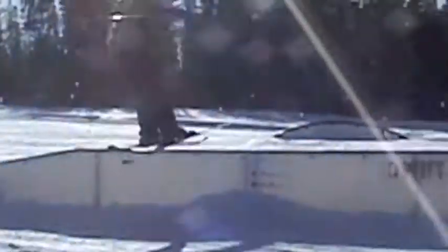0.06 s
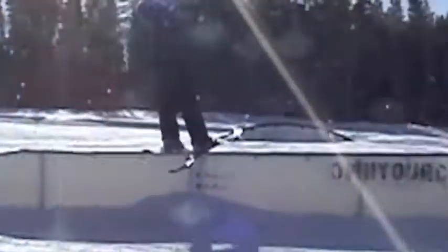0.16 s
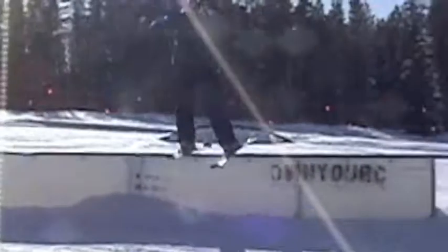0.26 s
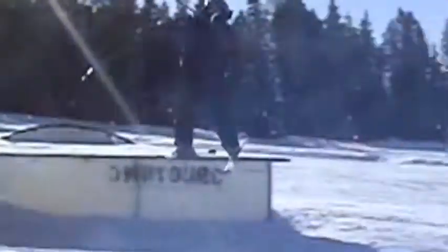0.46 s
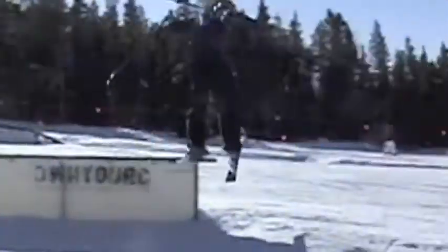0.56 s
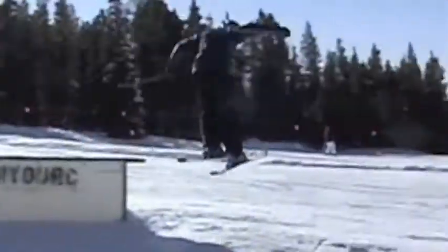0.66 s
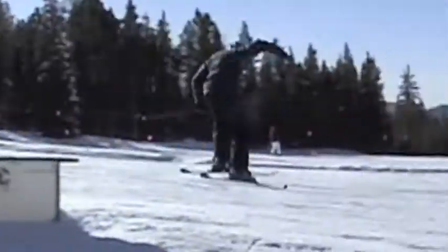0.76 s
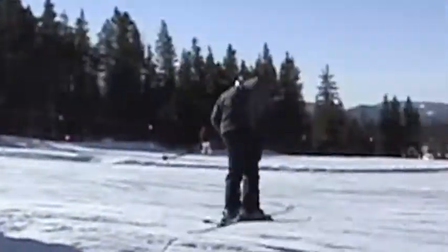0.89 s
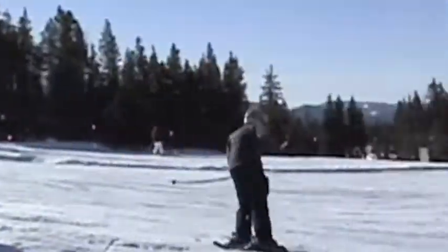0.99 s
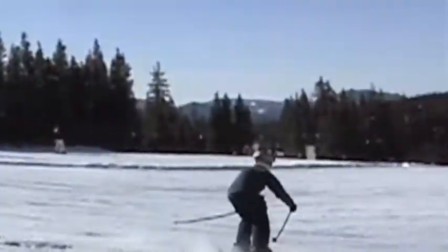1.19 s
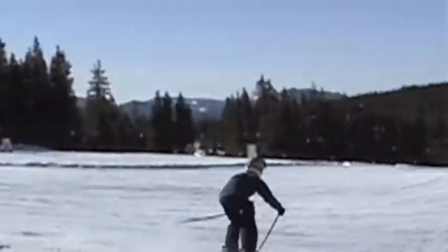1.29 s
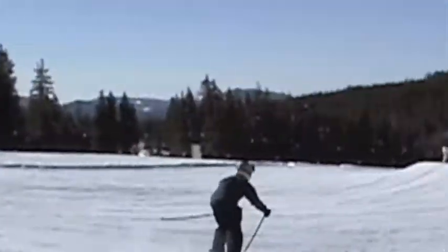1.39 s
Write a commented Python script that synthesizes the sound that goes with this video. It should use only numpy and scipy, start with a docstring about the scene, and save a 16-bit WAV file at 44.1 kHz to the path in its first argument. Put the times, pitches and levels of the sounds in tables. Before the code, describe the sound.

Skis clack onto a metal rail with a hollow thump and grind along it, ringing with a thin squeal. They knock together, slap onto packed snow and hiss away. Light wind rumbles on the microphone outdoors.

```python
"""In a snow park, a skier clacks onto the metal rail of a box and grinds along it.
Impact and friction excite the rail's modes, the hollow box booms, and a steel edge squeals by stick-slip.
The skis knock in the air, slap down on packed snow and hiss away over its grains.
Light wind rumbles on the microphone above the steady wash of the slope."""
import sys
import numpy as np
from scipy import signal
from scipy.fft import rfft, irfft, next_fast_len
from scipy.io import wavfile

SR = 44100
rng = np.random.default_rng(int(sys.argv[2]) if len(sys.argv) > 2 else 0)


def store_pcm(level_fs):
    """Save levels as 16-bit WAV."""
    pcm = np.round(np.clip(level_fs, -1, 1) * 32767).astype(np.int16)
    wavfile.write(sys.argv[1], SR, np.atleast_2d(pcm).T)


N = 63945
T = np.arange(N) / SR
ANTIPHASE = np.array([[1], [-1]])   # left, right

# normal modes of the rail: f/Hz, level/dB, T60/s
RAIL_RESONANCES = [(333, -15, .2), (691, -13, .25), (901, -13, .2), (1035, -8, .25), (1179, -3, .4),
                   (1275, -4, .25), (1320, -4, .3), (1367, -6, .3), (1630, -10, .2), (2130, -9, .2),
                   (2540, -7, .25), (2767, -8, .2), (3880, -11, .2)]


def rail():
    """Modal response: the impacts and friction of steel edges sound directly and set the rail ringing."""
    impacts, clacks = edge_impacts()
    friction, scrape = edge_friction()
    blows = from_db(-44.5 - 12 * (T < 0.19)) * impacts   # the first touches carry little weight
    ringing = ring(blows + from_db(-47) * friction, RAIL_RESONANCES)
    return from_bearing(clacks + scrape + ringing)


def edge_impacts():
    """Impact noise: brief contacts have a broad spectrum. Returns the force and its sound."""
    # edges strike the rail: t/s, level/dB, decay time/s, tilt/(dB per octave)
    strikes = [(0.1393, -17, 0.00089, 3), (0.1438, -23.5, 0.0028, -3), (0.153, -28, 0.006, -3),
               (0.2091, -9, 0.0014, 2.5), (0.2222, -14, 0.0021, -2.5), (0.2517, -13, 0.0032, 1.3),
               (0.277, -36, 0.0014, 10), (0.28, -6.5, 0.002, 1.1), (0.298, -17, 0.0031, -3.5),
               (0.3368, -13.5, 0.0066, -1.5), (0.3415, -16.5, 0.0016, -.5), (0.4, -14, 0.002, -5),
               (0.452, -17, 0.0067, -2), (0.4602, -18.5, 0.0028, 0.5), (0.576, -45, 0.0013, -12),
               (0.6029, -14, 0.0019, -1.3)]
    # spectrum of a clack: f/Hz, level/dB
    spectrum = [(100, -5.5), (450, -9.5), (800, 1), (1300, -5), (1800, 1.5), (2700, 1.5), (4500, -4),
                (7000, -6.5), (9500, -17), (14000, -41)]
    force = sound = 0
    for s, db, decay_s, tilt_db in strikes:
        crack = from_db(db) * burst(s, decay_s, lead_s=0.00037)
        force = force + crack
        sound = sound + colour(crack, spectrum, tilt_db)
    return force, sound


def edge_friction():
    """Sliding friction: fine roughness hisses and sparse nicks tick. Returns the force and its sound."""
    # envelope of the grind: t/s, level/dB
    envelope = [(.14, -65), (.205, -44), (.212, -23.5), (.245, -29.5), (.258, -23.5), (.33, -19),
                (.36, -22.5), (.44, -24.5), (.52, -22), (.6, -26.5), (.648, -23.5), (.659, -39.5),
                (.675, -28), (.695, -47), (.85, -51)]
    # spectrum of the scrape: f/Hz, level at the rail's start/dB, level at its end/dB
    spectra = [(116, -0.5, -17.5), (338, 4.5, 1.5), (463, -17, -5), (700, -14, 2.5), (1160, 5, -1),
               (1850, -9, -7), (2380, -1, 1), (3540, -5.5, -10), (4630, -9, -10.5), (6580, -8.5, -14),
               (8450, -19.5, -26.5), (14200, -34, -37.5)]
    db, = in_time(envelope)
    roughness = grains(per_s=5000, spread_db=2.5) + from_db(-20) * rng.standard_normal(N) * ANTIPHASE
    nicks = from_db(-13.5) * grains(per_s=300, spread_db=3)
    chatter_db = 0.98 * drift(140)
    force = (roughness + nicks) * from_db(db + chatter_db)
    return force, moving_contact(changing_colour(force, spectra, start_s=0.24, end_s=0.59))


def moving_contact(x):
    """Resonances come and go as the contact moves: narrow bands swell and fade independently."""
    octave = np.log2(np.maximum(np.arange(N // 2 + 1) * SR / N, 1))
    centres = np.log2(np.geomspace(500, 8000, 20))
    spectrum = rfft(x)
    bands = (irfft(spectrum * np.interp(octave, centres, band), N) for band in np.eye(len(centres)))
    return sum(band * from_db(1.5 * drift(19)) for band in bands)


def judder():
    """Forced vibration: juddering edges drive the rail's middle modes while the skis damp them."""
    # envelope of the judder: t/s, level/dB
    envelope = [(.245, -65), (.262, -19.5), (.30, -23), (.345, -43), (.365, -51), (.40, -25), (.425, -33),
                (.46, -25), (.49, -43), (.6, -90)]
    db, = in_time(envelope)
    pressed_t60_s = 0.046
    modes = [(hz, level, pressed_t60_s) for hz, level, _ in RAIL_RESONANCES if 1000 < hz < 1420]
    singing = sum(ring(rng.standard_normal(N), [mode]) for mode in modes)
    return (T > envelope[0][0]) * from_db(db) * rms_one(singing)


def squeal():
    """Stick-slip oscillation: an edge gives a high, raspy whistle that flutters in pitch and level."""
    # course of the squeal: t/s, f/Hz, level/dB
    course = [(.46, 5850, -52), (.49, 5870, -30), (.512, 5920, -32), (.528, 5850, -43), (.55, 5790, -32),
              (.58, 5790, -31), (.598, 5850, -34), (.612, 6170, -33), (.652, 6100, -48), (.675, 6130, -40),
              (.71, 6150, -62)]
    hz, db = in_time(course)
    wander_hz = 120 * drift(295)
    phase = 2 * np.pi * np.cumsum(hz + wander_hz) / SR
    rasp = from_db(-4) * drift(400) * np.cos(phase)
    flutter_db = 2.5 * drift(140)
    sounding = (T > course[0][0]) & (T < course[-1][0])
    return sounding * from_db(db + flutter_db) * (np.sin(phase) + rasp)


def box():
    """Impulse response: the skier's weight drops on the hollow box and its low modes boom."""
    # impulses on the box: t/s, level/dB
    thumps = [(0.15, -21), (0.209, -5), (0.2209, -6)]
    # normal modes of the box: f/Hz, level/dB, T60/s
    modes = [(91, -19, 0.11), (112.8, -8.5, 0.16), (153, -10.5, 0.095)]
    force = np.zeros(N)
    for s, db in thumps:
        force[int(s * SR)] -= from_db(db)
    soft_force = signal.sosfilt(signal.butter(2, 137, fs=SR, output="sos"), force)
    return ring(soft_force, modes)


def slaps():
    """Acceleration noise: each blow pushes and pulls the air, with a snap and a short rattle of the ski."""
    # blows in the air, then on snow: t/s, pulse level/dB, f/Hz, width/s, snap re pulse/dB,
    # rattle level/dB, rattle decay time/s, tilt/(dB per octave)
    blows = [(.7855, -18, 510, 0.0007, -9, -32.5, 0.0048, -0.5),
             (0.787, -7, 880, 0.00092, -14, -17, 0.0065, -4),
             (0.7931, -19.5, 470, 0.0015, -18, -24, 0.0037, -4),
             (.807, -29, 820, .002, -27, -32, 0.013, -3.5), (.926, -22.5, 320, 0.0017, -45, -37, .005, 1),
             (1.0327, -18, 660, 0.0012, -5.5, -31, 0.0059, 5),
             (1.0916, -3, 523, 0.00049, -3, -14, 0.0019, 2),
             (1.1266, -12, 930, 0.0008, -4, -15, 0.0077, -0.5),
             (1.1335, -14.5, 317, 0.003, -15, -37, 0.004, -1),
             (1.252, -22, 483, 0.0009, -22, -33, 0.018, -9.5)]
    # spectrum of a ski's rattle: f/Hz, level/dB
    spectrum = [(80, -20), (190, -26), (320, 0), (600, 3.5), (900, 0), (1400, -11), (2300, -8.5),
                (4000, -18.5), (6500, -22), (13000, -38.5)]
    low_cut = signal.butter(2, 200, "high", fs=SR, output="sos")
    out = 0
    for s, pulse_db, hz, width_s, snap_db, rattle_db, decay_s, tilt_db in blows:
        t = T - s
        snap_s = 0.00005 * 2 ** -tilt_db   # a duller blow snaps more slowly
        snap = from_db(snap_db) * np.tanh(t / snap_s)
        pulse = -(np.sin(2 * np.pi * hz * t) + snap) * np.exp(-np.abs(t) / width_s)
        pulse = signal.sosfiltfilt(low_cut, pulse + 1e-18)
        rattle = colour(burst(s, decay_s, lead_s=0.0026), spectrum, tilt_db)
        out = out + from_db(pulse_db) * pulse + from_db(rattle_db) * rattle
    return out


def snow():
    """Granular noise: packed snow crunches under the landing, then thins to a hiss."""
    # envelope of the run on snow: t/s, level/dB
    envelope = [(1.02, -80), (1.036, -32.5), (1.07, -43), (1.108, -40.5), (1.128, -26), (1.175, -28.5),
                (1.21, -35), (1.24, -40), (1.256, -40), (1.29, -38.5), (1.36, -45.5), (1.45, -45.5)]
    # spectrum of the snow: f/Hz, level on landing/dB, level when gliding/dB
    spectra = [(60, -23, -10), (200, -8.5, -12), (620, -1.5, 4), (1230, -2, -5.5), (1710, -7.5, -8),
               (3480, -13, -13.5), (6450, -15, -8), (9500, -23.5, -15.5), (13900, -33, -24)]
    db, = in_time(envelope)
    crunch = grains(per_s=3600, spread_db=-1) * from_db(db + 1.57 * drift(48))
    return changing_colour(crunch, spectra, start_s=1.23, end_s=1.35)


def wind():
    """Turbulence: gusts make low-frequency pressure fluctuations on the microphone."""
    # envelope of the gusts: t/s, level/dB
    envelope = [(0, -60), (.13, -49.5), (.165, -40.5), (.2, -40.5), (.27, -26), (.34, -31), (.45, -32.5),
                (.53, -37), (.66, -42), (.8, -42), (.862, -45), (.88, -32.5), (.95, -37), (1.02, -36.5),
                (1.13, -46), (1.22, -54), (1.45, -58.5)]
    # spectrum of the wind: f/Hz, level/dB
    spectrum = [(25, -42), (60, -6), (110, 3), (190, 1.5), (320, -15), (600, -26), (2000, -65)]
    db, = in_time(envelope)
    return from_db(db) * colour(wide_noise(side_db=-2.5), spectrum)


def rumble():
    """Antiphase pressure: a deep rumble pushes the two capsules in opposite senses."""
    # envelope of the rumble: t/s, level/dB
    envelope = [(0, -32), (.11, -44), (.28, -27), (.45, -44), (.65, -54), (1.1, -51), (1.45, -66)]
    # spectrum of the rumble: f/Hz, level/dB
    spectrum = [(20, -11), (45, 14), (80, -1), (160, -28), (500, -64)]
    db, = in_time(envelope)
    return from_db(db) * colour(wide_noise(side_db=-15.5), spectrum) * ANTIPHASE


def slope_wash():
    """Stationary noise: the steady, broad background of the slope."""
    # spectrum of the background: f/Hz, level/dB
    spectrum = [(25, -28), (120, -6), (400, 4), (650, 7.5), (1150, 4), (1700, 0), (3000, -3.5), (6000, -10),
                (10000, -16), (14000, -27.5)]
    return from_db(-46) * colour(wide_noise(side_db=-7), spectrum)


def scatter(x, t60_s=0.041):
    """Diffuse reflection: snow and box return a faint, short tail, different in each channel."""
    tail = rng.standard_normal((2, N)) * np.exp(-np.log(1000) * T / t60_s)
    return from_db(-16) * signal.fftconvolve(x, rms_one(tail) / np.sqrt(N), axes=1)[:, :N]


def from_bearing(x, shadow_hz=1240):
    """Acoustic shadow: the treble is louder on the skier's side."""
    # the skier comes in from the left: t/s, treble level left minus right/dB
    bearing = [(.15, 13), (.215, 4.5), (.26, -0.5), (.66, -0.5)]
    lean_db, = in_time(bearing)
    bass = signal.sosfilt(signal.butter(1, shadow_hz, fs=SR, output="sos"), x)
    return bass + (x - bass) * from_db(lean_db / 2 * ANTIPHASE)


def ring(force, modes):
    """Modal superposition: one force drives a set of damped resonators."""
    out = 0
    for hz, db, t60 in modes:
        r, w = from_db(-60 / (t60 * SR)), 2 * np.pi * hz / SR
        out = out + from_db(db) * signal.lfilter([.5, 0, -.5], [1, -2 * r * np.cos(w), r * r], force + 1e-18)
    return out


def burst(s, decay_s, lead_s):
    """Noise transient: tiny contacts swell exponentially up to time s and die away."""
    return rng.choice([-1, 1], N) * np.exp(-np.maximum((T - s) / decay_s, (s - T) / lead_s))


def grains(per_s, spread_db):
    """Shot noise: random clicks of uneven size, rms 1."""
    sizes = from_db(spread_db * np.minimum(rng.exponential(1, N), 4)) * rng.choice([-1, 1], N)
    return rms_one(sizes * (rng.random(N) < per_s / SR))


def wide_noise(side_db):
    """Mid-side stereo: common white noise plus an antiphase part."""
    return rng.standard_normal(N) + from_db(side_db) * rng.standard_normal(N) * ANTIPHASE


def drift(rate_hz):
    """Random modulation: low-passed noise, rms 1."""
    r = np.exp(-2 * np.pi * rate_hz / SR)
    return rms_one(signal.lfilter([1], [1, -2 * r, r * r], rng.standard_normal(2 * N))[N:])


def colour(x, points, tilt_db=0, keep_power=True):
    """Minimum-phase filter, tilted per octave above 500 Hz; keep_power holds white noise at its level."""
    size = next_fast_len(2 * N)
    octave = np.log2(np.maximum(np.arange(size // 2 + 1) * SR / size, 10))
    hz, db = np.transpose(points)
    gain = from_db(np.interp(octave, np.log2(hz), db) + tilt_db * np.maximum(octave, np.log2(500)))
    cepstrum = irfft(np.log(rms_one(gain) if keep_power else gain), size)
    cepstrum[1:size // 2] *= 2   # folding the cepstrum makes the filter causal
    cepstrum[size // 2 + 1:] = 0
    return irfft(rfft(x, size) * np.exp(rfft(cepstrum)), size)[..., :N]


def changing_colour(x, rows, start_s, end_s):
    """Linear crossfade from a table's first spectrum to its second."""
    hz, early, late = np.transpose(rows)
    share = np.clip((T - start_s) / (end_s - start_s), 0, 1)
    return (1 - share) * colour(x, np.c_[hz, early]) + share * colour(x, np.c_[hz, late])


def in_time(rows):
    """Linear interpolation of each column at every sample."""
    s, *columns = np.transpose(rows)
    return [np.interp(T, s, c) for c in columns]


def from_db(db):
    """Level to amplitude ratio."""
    return 10 ** (np.asarray(db) / 20)


def rms_one(x):
    """Normalisation to rms 1."""
    return x / np.sqrt(np.mean(x ** 2) + 1e-20)


def scene():
    """Superposition: the skis, their reflections, the box and the background add in the open air."""
    skis = rail() + judder() + squeal() + slaps() + snow()
    return skis + scatter(skis) + box() + wind() + rumble() + slope_wash()


def record(dry):
    """Transduction: two slightly unlike capsules, clipping of the highest peaks and a band limit."""
    # imbalance of the capsules: f/Hz, level left minus right/dB
    imbalance = [(100, -0.5), (480, -0.2), (950, -1.1), (1600, 0.5), (2400, 3.5), (3400, 2.2), (5500, -3),
                 (9000, -0.5)]
    hz, db = np.transpose(imbalance)
    heard = [colour(x, np.c_[hz, side * db / 2], keep_power=False) for x, side in zip(dry, (1, -1))]
    high_cut = signal.ellip(10, .1, 80, 14000, fs=SR, output="sos")
    return signal.sosfilt(high_cut, np.clip(heard, -.85, .85))


dry = scene()
out = record(dry)
store_pcm(out)
```